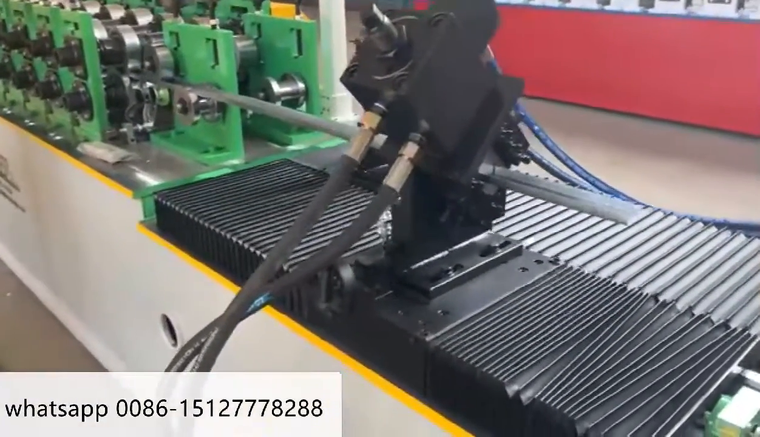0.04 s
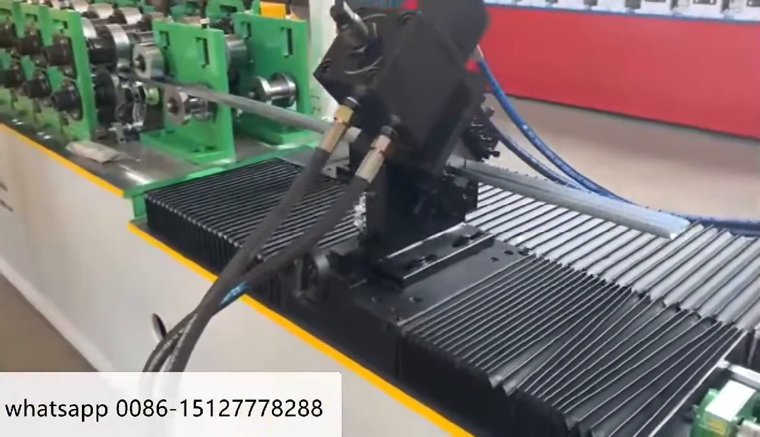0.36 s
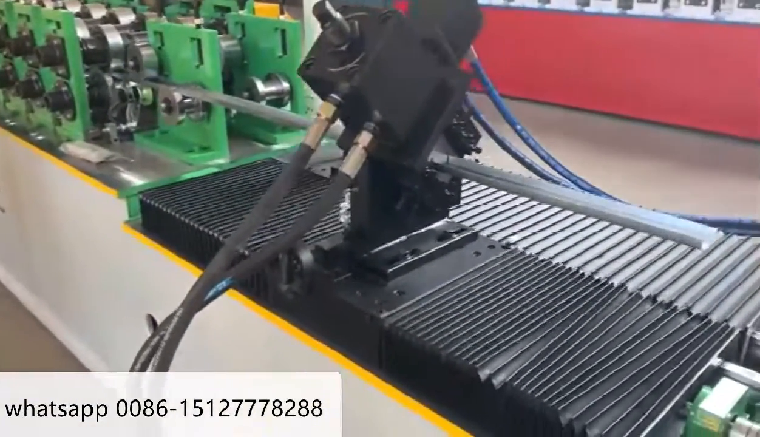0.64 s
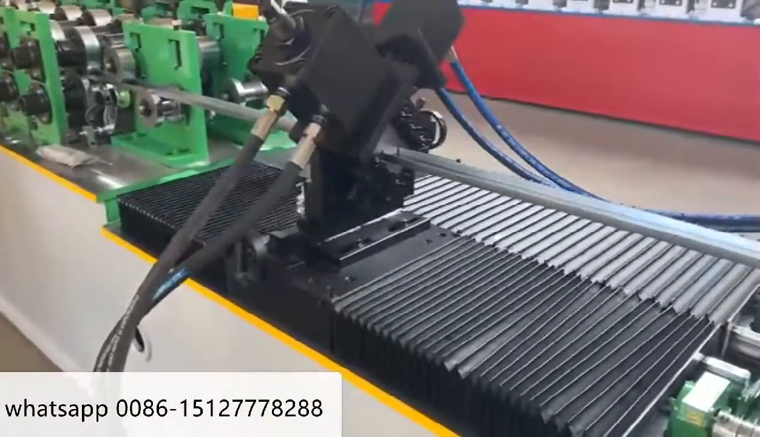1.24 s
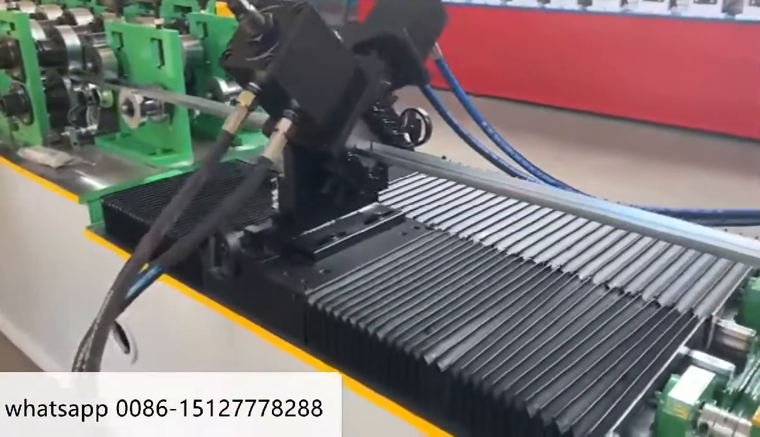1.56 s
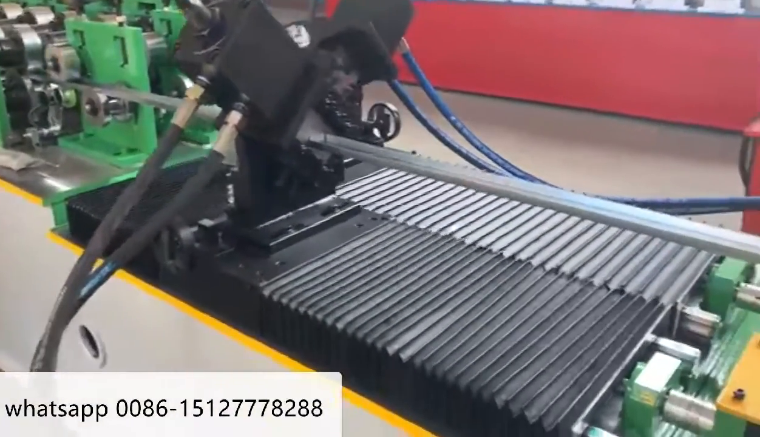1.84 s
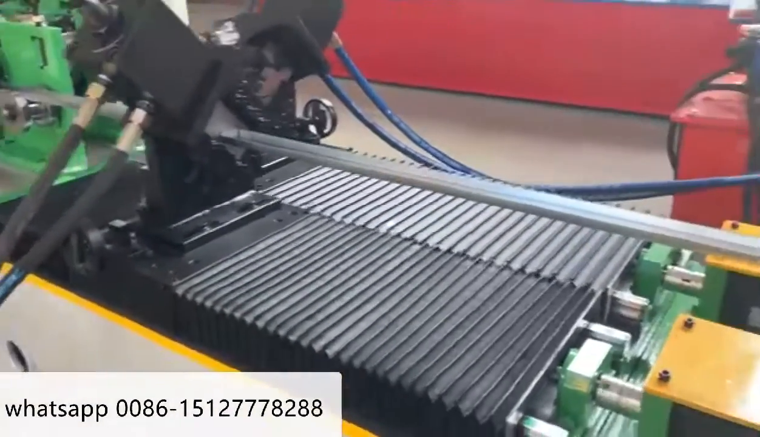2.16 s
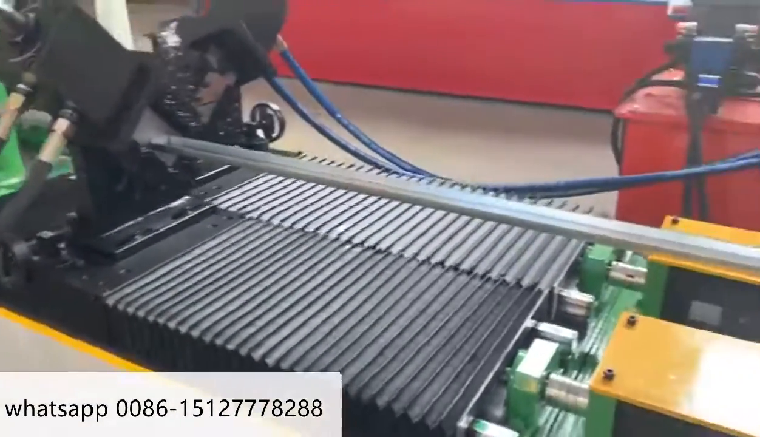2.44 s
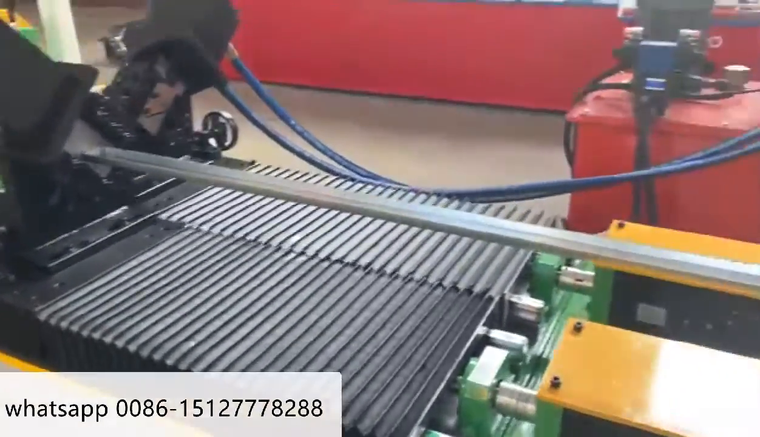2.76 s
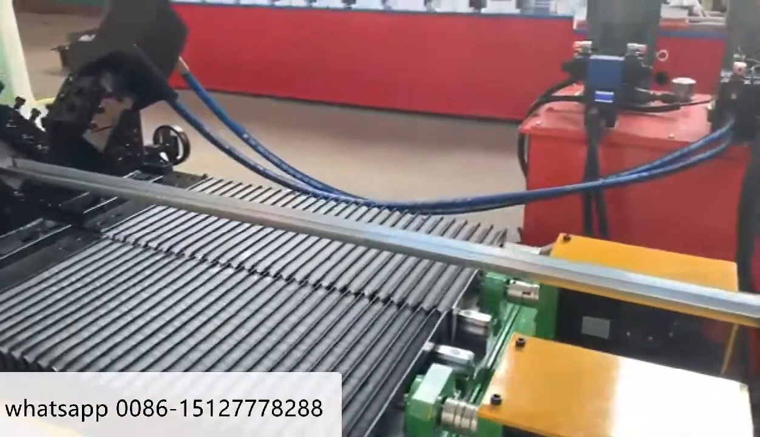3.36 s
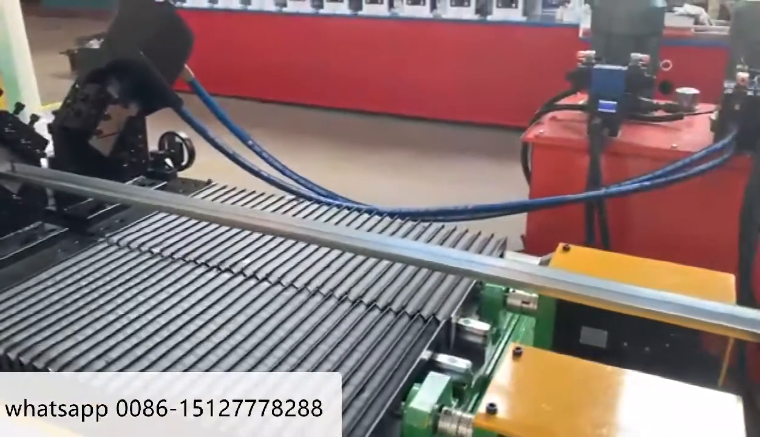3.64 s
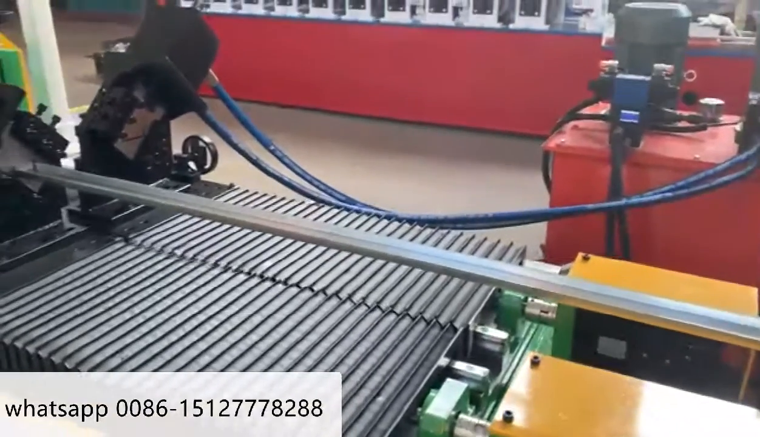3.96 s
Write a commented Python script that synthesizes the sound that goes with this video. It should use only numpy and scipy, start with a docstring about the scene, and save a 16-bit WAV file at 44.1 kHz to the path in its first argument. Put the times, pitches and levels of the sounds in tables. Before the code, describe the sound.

A length of steel falls with a ringing clatter while a factory machine hums and rumbles.

```python
"""A factory hall, where a roll forming line runs: a hydraulic pump hums with periodic tones, the rollers
rumble, a drive whines at its switching frequency and the steel strip hisses by friction in its guides.
After a dull knock in the frame, a length of steel crashes down, bounces and rattles. The impacts excite
its modes, which ring out, and the hall reverberates. An automatic gain control ducks at the crash and
creeps back."""
import sys
import numpy as np
from scipy import signal
from scipy.fft import rfft, irfft
from scipy.io import wavfile
from scipy.ndimage import uniform_filter1d

SR = 44100
rng = np.random.default_rng(int(sys.argv[2]) if len(sys.argv) > 2 else 0)


def to_wav(s):
    """Save 16-bit WAV."""
    ch = np.atleast_2d(s).T  # columns
    pcm = np.round(np.clip(ch, -1, 1) * 32767)  # PCM
    wavfile.write(sys.argv[1], SR, pcm.astype(np.int16))


N = 176400

# width of the hall's sound (frequency [Hz], side minus mid level [dB])
HALL_WIDTH = [(60, -32), (110, -29), (200, -6), (500, -8), (900, 1.5), (1500, 1.5), (2600, 1), (4500, -0.5),
              (7600, -5)]
# effort of the drive, which lifts its whine and the hum (time [s], level [dB])
DRIVE_EFFORT = [(0, 2.5), (.62, -2.5), (1.1, -3.5), (2.299, 0.5), (2.751, -0.5), (3.2, 1.5), (3.5, 1.5),
                (3.7, 2.5), (4, 3.5)]
# pump and gearbox tones (frequency [Hz], relative level [dB], waver [dB])
PUMP_TONES = [(85.5, -11.5, 3), (101, -18, 3), (210, -8.5, 2), (298.6, 0, 1.5), (497.5, -21, 2.5),
              (597.8, -12, 1.5), (839.8, -19.5, 3)]
HUM_DB, HUM_EFFORT_SHARE = -29.5, 0.19
# spectrum of the roller rumble (frequency [Hz], relative level [dB])
ROLLER_SPECTRUM = [(20, -22.5), (45, -14), (66, -1), (84, 6.5), (115, -3.5), (170, -6), (260, -4.5),
                   (390, -5.5), (490, -10), (620, -10), (900, -17.5), (1400, -21.5), (2000, -26.5),
                   (2700, -29), (3200, -36), (5200, -35.5), (7800, -36.5)]
RUMBLE_DB, THROB_DB, FLUTTER_DB = -29, 1.46, 1.57
# switching tone and sidebands (offset [multiples of the turning rate], relative level [dB])
WHINE_LINES = [(-6, -12), (-4, -12), (-3, -7), (-2, -11), (-1, -10), (0, 0), (1, -13), (3, -9), (6, -9.5)]
WHINE_HZ, TURN_HZ, WHINE_DB, WHINE_WAVER_DB = 4040.3, 27, -50, 3.5
SIZZLE_DB, SIZZLE_WIDTH_HZ = -45, 160
# envelope of the strip rubbing in the guides (time [s], level [dB])
RUB_ENVELOPE = [(0, -39), (.18, -40.5), (.35, -40.5), (.6, -45.5), (1.7, -52), (2.3, -49), (2.65, -39),
                (3.15, -46.5), (3.72, -51.5), (3.81, -40.5), (4, -44)]
# spectrum of that friction (frequency [Hz], relative level [dB])
RUB_SPECTRUM = [(500, -38.5), (1500, -7), (2500, 1.5), (3600, 3.5), (5200, -10), (6500, 0), (7800, -11)]
# scrapes where the strip catches (time [s], level [dB])
STRIP_CATCHES = [(.178, -41), (.208, -29.5), (0.256, -46), (.323, -38.5)]
RUB_GRAIN_DB, SCRAPE_GRAIN_DB, SCRAPE_DECAY_S = 3, 8.5, 0.032
FLICKER_DB, FLICKER_S, FLICKER_WIDTH_HZ = 4.6, 0.075, 170
# dull knocks in the frame (time [s], level [dB])
FRAME_KNOCKS = [(.4155, -24.5), (.669, -28)]
# the frame's modes (frequency [Hz], relative level [dB], t60 [s])
FRAME_MODES = [(482, -3, 0.13), (615, 4, 0.076), (745, -4, 0.04), (880, -10.5, 0.059), (1388, -16, 0.089)]
HALL_T60_S, HALL_DB = 0.59, -4.5
# blows of steel on steel (time [s], level [dB], contact decay time [s], pitch of the struck spot [Hz])
STEEL_BLOWS = [(0.662, -2.5, 0.026, 4760), (0.68, 1.5, 0.0054, 3200), (0.687, 5, 0.009, 6140),
               (0.726, 2, 0.0063, 4420), (0.764, -4.5, 0.019, 6520), (0.795, -6.5, 0.0015, 4670),
               (0.831, -7.5, 0.0028, 4200), (0.846, 0.5, 0.002, 3550), (0.896, -4.5, 0.0029, 4650),
               (0.909, -2.5, 0.014, 2940), (1.026, -10.5, 0.017, 4750), (1.109, -9.5, 0.016, 3460),
               (1.167, -10.5, 0.041, 2660), (1.29, -24.5, 0.011, 2650)]
CHATTER_DB, SPOT_DB, SPOT_WIDTH_HZ, RIPPLE_DB = 2.5, 6, 450, 1
# spectrum of the steel's lesser modes and the crack of contact (frequency [Hz], relative level [dB])
STEEL_SPECTRUM = [(200, -36.5), (700, -31.5), (1000, -16), (1300, 1.5), (1650, 0), (1850, -6), (2050, -0.5),
                  (2400, 4.5), (3300, 7.5), (4100, 3), (4750, 4), (5450, -1), (6300, 2.5), (7200, -0.5),
                  (7800, -15)]
DENSE_DB, DENSE_T60_AT_3KHZ_S, MODE_SPACING_HZ = -28.5, 1.0, 44
CRACK_DB, CRACK_T60_S = -13.5, 0.063
# the steel's strongest modes (frequency [Hz], relative level [dB], t60 [s])
STEEL_MODES = [(1184, -13.5, 2.2), (1357, -14, 2), (1556, -15, 1.4), (1669, -16, 2), (1940, -8, 1.6),
               (2008, -9, 1.2), (2132, -9, 1.4), (2283, -1.5, 1.4), (2315, -6, 1.4), (2467, -5, 1.4),
               (2676, -9, 1.3), (2828, -6, 1.3), (2988, -6, 1.2), (3090, -9, 1.2), (3248, -2, .7),
               (3540, -7, .8), (3623, -4.5, .9), (3845, -6, .5), (4150, -9, .7), (4400, -7, .6),
               (4560, 0, .9), (4673, -6, .8), (4759, -7, .8), (4915, -7, .7), (5098, -9, .7),
               (5434, -9, .6), (5636, -9, .6), (6164, -8, .6), (6481, -9, .6), (6819, -6, .6),
               (7553, -8, .6)]
MODES_DB, SHIMMER_DB = -34, 2.8
RATTLE_START_S, RATTLE_PER_S, RATTLE_TAPS = 0.73, 62, 48
RATTLE_DB, RATTLE_FALL_DB_PER_S, RATTLE_SCATTER_DB = -9.5, 23, 1.5
AGC_THRESHOLD_DB, AGC_RATIO, AGC_ATTACK_S, AGC_RECOVER_DB_PER_S = -21, 2.52, 0.022, 0.65
TREBLE_CUT_HZ = 7620

TIME = np.arange(N) / SR
BIN_HZ = np.maximum(np.arange(N // 2 + 1) * SR / N, 1)


def undb(db):
    """Amplitude ratio: tenfold for every 20 dB."""
    return 10 ** (np.asarray(db) / 20)


def unit(x):
    """Normalisation to rms 1."""
    return x / np.sqrt(np.mean(x ** 2))


def colour(x, points):
    """Spectral shaping by a curve of (frequency [Hz], gain [dB]) points."""
    hz, db = np.array(points, float).T
    return irfft(rfft(x) * undb(np.interp(np.log(BIN_HZ), np.log(hz), db)), N)


def walk(rate_hz):
    """Random modulation: noise of rms 1, low-passed at rate_hz."""
    spectrum = rfft(rng.standard_normal(4096))
    hz = np.arange(len(spectrum)) * SR / N
    slow = unit(irfft(spectrum * (hz > 0) / (1 + (hz / rate_hz) ** 4)))
    return np.interp(np.arange(N), np.linspace(0, N, len(slow)), slow)


def hall_noise():
    """Partial coherence: stereo noise, alike in the bass and wide in the treble."""
    mid, side = rng.standard_normal((2, N))
    side = colour(side, HALL_WIDTH)
    return np.array([mid + side, mid - side])


def fade(t60, age=TIME):
    """Exponential decay by 60 dB in t60 seconds."""
    return np.exp(-np.log(1000) * age / t60)


def convolve(x, response):
    """Convolution with a stereo impulse response."""
    return signal.fftconvolve(np.atleast_2d(x), response, axes=1)[:, :N]


def drifting_clock(depth, rate_hz):
    """Frequency modulation: time whose speed wanders by the rms fraction depth."""
    return TIME + np.cumsum(depth * walk(rate_hz)) / SR


def tone(hz, clock, spread_rad):
    """Interchannel phase: a sine whose phase difference between the two sides wanders."""
    phase = 2 * np.pi * (hz * clock + rng.random())
    return np.sqrt(2) * np.sin(phase + spread_rad * walk(1.0) * np.array([[.5], [-.5]]))


def effort():
    """Amplitude envelope set by the drive's effort."""
    return undb(np.interp(TIME, *np.array(DRIVE_EFFORT).T))


def pump():
    """Periodic forcing: pump and gear tones share a drift of speed, waver and rise with effort."""
    clock = drifting_clock(depth=0.0025, rate_hz=2.8)
    hum = sum(undb(HUM_DB + db + waver * walk(14)) * tone(hz, clock, spread_rad=0.71 * hz / 250)
              for hz, db, waver in PUMP_TONES)
    return effort() ** HUM_EFFORT_SHARE * hum


def rollers():
    """Amplitude-modulated noise of the roll stands: the bass throbs, the rest flutters."""
    noise = unit(colour(hall_noise(), ROLLER_SPECTRUM))
    bass = signal.sosfiltfilt(signal.butter(2, 130, fs=SR, output="sos"), noise)
    throb = bass * undb(THROB_DB * walk(13))
    flutter = (noise - bass) * undb(FLUTTER_DB * walk(17))
    return undb(RUMBLE_DB) * (throb + flutter)


def drive():
    """Modulation sidebands flank the motor's switching tone; a narrow sizzle pulses with each turn."""
    clock = drifting_clock(depth=0.00031, rate_hz=3.9)
    lines = sum(undb(db + WHINE_WAVER_DB * walk(7.1)) * tone(WHINE_HZ + k * TURN_HZ, clock, 1.62)
                for k, db in WHINE_LINES)
    detuning = 2 * (BIN_HZ - WHINE_HZ) / SIZZLE_WIDTH_HZ
    sizzle = unit(irfft(rfft(hall_noise()) / (1 + detuning ** 2) ** 0.41, N))
    pulse = 1 + 0.3 * np.sin(2 * np.pi * TURN_HZ * TIME)
    return undb(WHINE_DB) * lines + undb(SIZZLE_DB) * sizzle * pulse


def burst(start, decay_s):
    """Transient envelope: a sudden onset, then exponential decay."""
    return (TIME >= start) * np.exp(-np.abs(TIME - start) / decay_s)


def strip():
    """Sliding friction: the strip hisses grainily in the guides and scrapes where it catches."""
    envelope = undb(np.interp(TIME, *np.array(RUB_ENVELOPE).T) + RUB_GRAIN_DB * walk(31))
    slide = unit(colour(hall_noise() * envelope, RUB_SPECTRUM)) * np.sqrt(np.mean(envelope ** 2))
    catches = sum(undb(db) * burst(start, SCRAPE_DECAY_S) for start, db in STRIP_CATCHES)
    grit = unit(colour(hall_noise() * undb(SCRAPE_GRAIN_DB * walk(300)), RUB_SPECTRUM))
    return slide + catches * grit


def flicker(x):
    """Band-wise modulation: narrow bands dip and swell at random, giving a patchy, fluttering sound."""
    hz, t, cells = signal.stft(x, SR, nperseg=512)
    patches = uniform_filter1d(rng.standard_normal(cells.shape[1:]), round(FLICKER_S / t[1]), axis=1)
    patches = uniform_filter1d(patches, round(FLICKER_WIDTH_HZ / hz[1]), axis=0)
    gain = unit(undb(FLICKER_DB * np.minimum(unit(patches), 0.8)))  # swells are capped, dips are not
    return signal.istft(cells * gain, SR)[1][:, :N]


def frame_knocks():
    """Heavy damping: the frame's modes die quickly, so each knock is short and dull."""
    out = 0
    for start, level_db in FRAME_KNOCKS:
        age = np.maximum(TIME - start, 0)
        for hz, db, t60 in FRAME_MODES:
            out = out + undb(level_db + db) * np.sin(2 * np.pi * hz * age) * fade(t60, age)
    return out


def hall(x):
    """Reverberation: a diffuse tail builds up and decays behind the direct sound."""
    tail = rng.standard_normal((2, N)) * fade(HALL_T60_S) * (1 - fade(0.28))
    return x + undb(HALL_DB) * convolve(x, tail / np.linalg.norm(tail[0]))


def blow_powers():
    """Impact: each blow spreads its energy over a brief, decaying contact."""
    powers = []
    for start, db, decay_s, _ in STEEL_BLOWS:
        contact = burst(start, decay_s)
        powers.append(undb(db) ** 2 * contact / contact.sum())
    return powers


def lesser_modes():
    """High modal density: unevenly spaced, equal partials with a random phase on each side."""
    grid_hz = np.arange(200, 8000, MODE_SPACING_HZ)
    chance = rng.random((len(grid_hz), 3)).T
    hz = grid_hz + MODE_SPACING_HZ * chance[0]
    spectrum = np.zeros((2, N // 2 + 1), complex)
    spectrum[:, (hz * N / SR).astype(int)] = np.exp(2j * np.pi * chance[1:])
    return irfft(spectrum, N)


def steel_response():
    """Impulse response of the steel: a crack, and lesser modes whose t60 halves with each octave up."""
    crack = unit(colour(rng.standard_normal((2, N)), STEEL_SPECTRUM)) * fade(CRACK_T60_S)
    spectrum = rfft(unit(colour(lesser_modes(), STEEL_SPECTRUM)))
    dense = 0
    for octave in range(-4, 3):
        band = np.maximum(1 - np.abs(np.log2(BIN_HZ / 3000) - octave), 0)
        dense = dense + irfft(spectrum * band, N) * fade(DENSE_T60_AT_3KHZ_S / 2 ** octave)
    return undb(DENSE_DB) * dense + undb(CRACK_DB) * crack


def clatter(powers, taps):
    """Impact excitation: chattering blows, coloured by the struck spot, and taps drive the steel."""
    chatter = unit(rng.standard_normal(N) * undb(CHATTER_DB * rng.standard_normal(N)))
    response = steel_response()
    hz = np.arange(200, 8200, 160)
    force = taps
    for power, (*_, spot_hz) in zip(powers, STEEL_BLOWS):
        db = SPOT_DB / (1 + (2 * (hz - spot_hz) / SPOT_WIDTH_HZ) ** 2)
        db += RIPPLE_DB * rng.standard_normal(len(hz))  # other resonances vary from blow to blow
        db -= 10 * np.log10(np.mean(undb(db) ** 2))  # mean power gain of 1
        force = force + colour(chatter * np.sqrt(power), np.c_[hz, db])
    return convolve(force, response)


def ringing(power):
    """Resonance: the strong modes store the energy of the impacts and shimmer as they lose it."""
    out = 0
    for hz, db, t60 in STEEL_MODES:
        retention = np.exp(-2 * np.log(1000) / (t60 * SR))
        energy = signal.lfilter([1], [1, -retention], power)
        clock = drifting_clock(depth=0.0016, rate_hz=21.2)
        amplitude = undb(MODES_DB + db + SHIMMER_DB * walk(47)) * np.sqrt(energy)
        out = out + amplitude * tone(hz, clock, spread_rad=3.54)
    return out


def rattle():
    """Inelastic rebounds: quick, uneven taps weaken as the steel settles."""
    jitter, scatter = rng.standard_normal((RATTLE_TAPS, 2)).T
    age = (np.arange(RATTLE_TAPS) + 0.5 + 0.5 * np.tanh(jitter)) / RATTLE_PER_S
    level_db = RATTLE_DB - RATTLE_FALL_DB_PER_S * age + RATTLE_SCATTER_DB * scatter
    taps = np.zeros(N)
    taps[((RATTLE_START_S + age) * SR).astype(int)] = undb(level_db)
    return taps


def scene():
    """Superposition of the running line, the knocks and crash in the hall, and the ringing steel."""
    powers, taps = blow_powers(), rattle()
    line = pump() + rollers() + effort() * drive() + flicker(strip())
    crash = flicker(hall(clatter(powers, taps)))
    ring = ringing(sum(powers) + taps ** 2)
    return line + hall(frame_knocks()) + crash + ring


def record(dry):
    """Compression: between a bass and a treble cut, the gain ducks fast and recovers slowly."""
    dry = signal.sosfilt(signal.butter(2, 22, "high", fs=SR, output="sos"), dry)
    step = 1 / (AGC_ATTACK_S * SR)
    power = signal.lfilter([step], [1, step - 1], np.mean(dry ** 2, axis=0))
    excess_db = np.maximum(10 * np.log10(power + 1e-12) - AGC_THRESHOLD_DB, 0)
    recovery_db = AGC_RECOVER_DB_PER_S * TIME
    duck_db = np.maximum.accumulate(excess_db * (1 - 1 / AGC_RATIO) + recovery_db) - recovery_db
    treble_cut = signal.ellip(12, 0.2, 80, TREBLE_CUT_HZ, fs=SR, output="sos")
    return signal.sosfilt(treble_cut, dry * undb(-duck_db))


dry = scene()
out = record(dry)
to_wav(out)
```